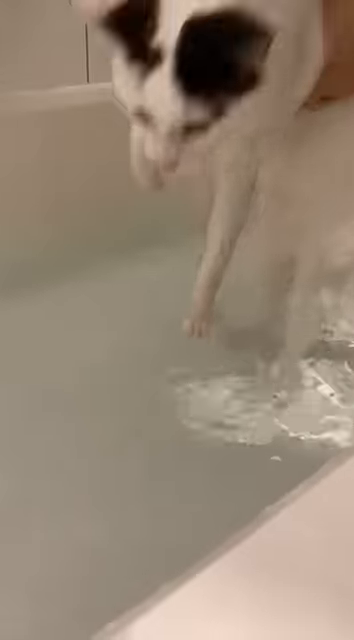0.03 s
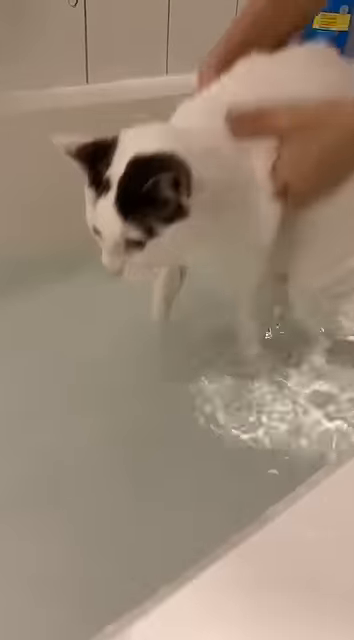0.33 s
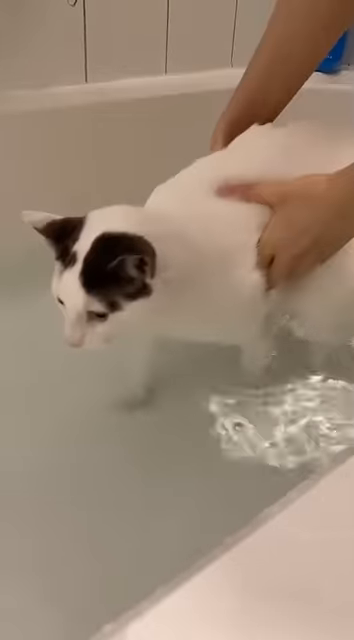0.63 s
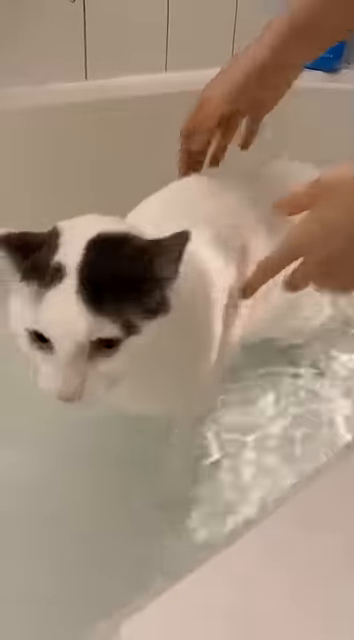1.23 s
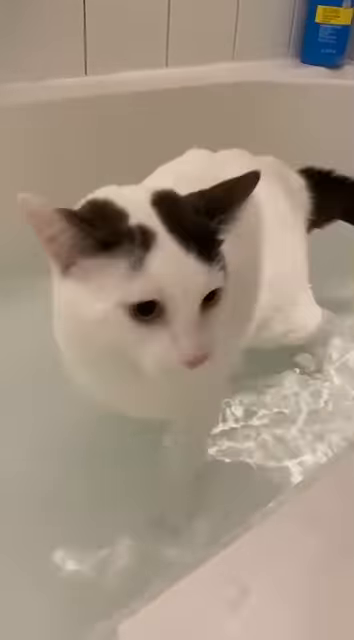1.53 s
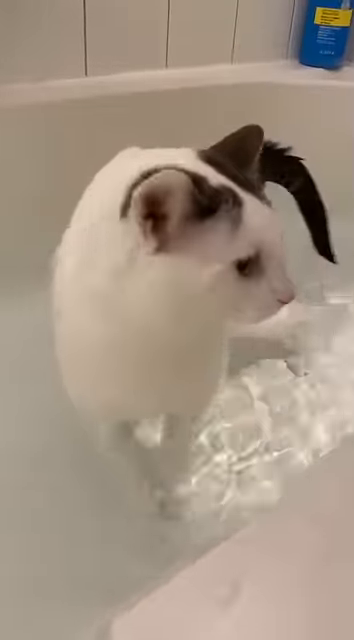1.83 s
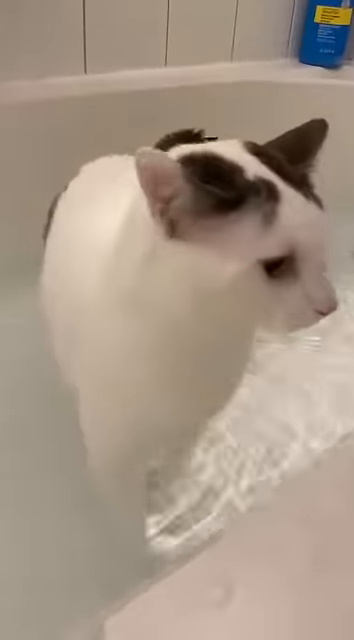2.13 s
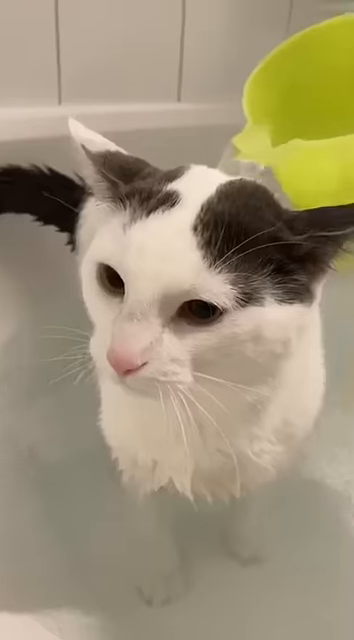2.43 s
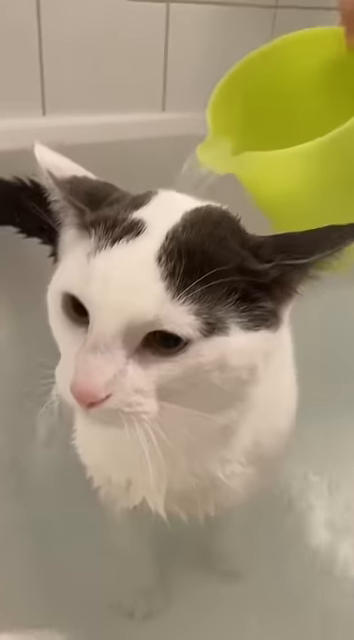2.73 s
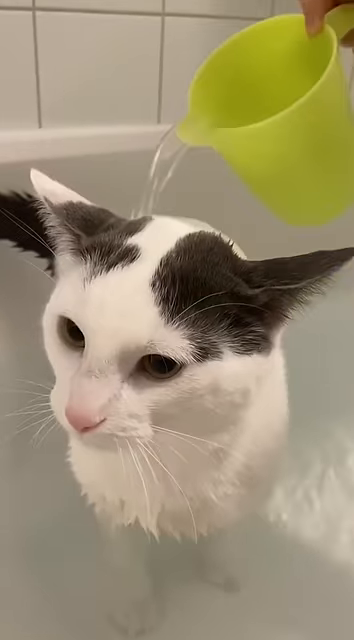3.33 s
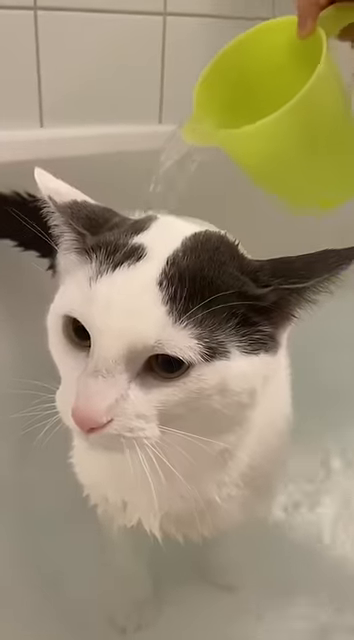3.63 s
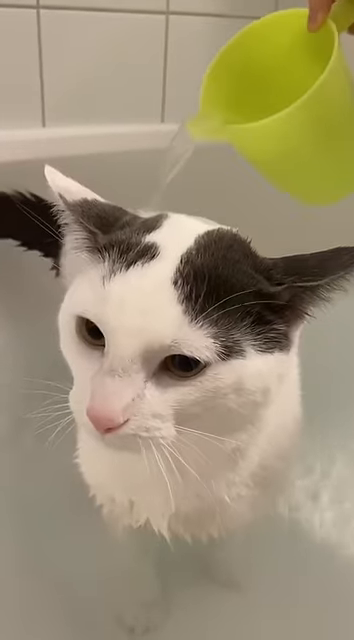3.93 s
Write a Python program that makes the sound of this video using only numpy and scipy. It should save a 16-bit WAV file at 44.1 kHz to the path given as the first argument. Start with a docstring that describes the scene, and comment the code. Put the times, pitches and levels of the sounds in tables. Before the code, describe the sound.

Water in a bathtub, heard from the rim: a small splash with drips, a quiet stretch of faint lapping, then louder sloshing and pouring with plops and sharp drops. A low rumble runs underneath in the small, echoing bathroom.

```python
"""Bathing a cat

A cat wades in a part-filled tub in a small tiled bathroom: a paw splashes and drips fall over a low
rumble. The level dips briefly, the water sloshes and rings the tub, and a jug is emptied over the cat.
Heard from the rim, the run-off gurgles, spatters and plops: trapped air bubbles ring like tiny bells,
and drops crack as they hit the water."""
import sys
import numpy as np
from scipy import signal
from scipy.fft import rfft, irfft
from scipy.io import wavfile
from scipy.ndimage import uniform_filter1d

SR = 44100
rng = np.random.default_rng(int(sys.argv[2]) if len(sys.argv) > 2 else 0)


def to_wav(sig):
    """Store sig (one row per channel, or 1-D mono) as 16-bit WAV at the path in sys.argv[1].

    Samples outside -1..1 are clipped; the rate is SR.
    """
    pcm = np.clip(np.atleast_2d(sig), -1, 1) * 32767
    pcm = np.round(pcm).astype(np.int16)
    wavfile.write(sys.argv[1], SR, pcm.T)  # frames by channels


N = 176400
TIME = np.arange(N) / SR
SIDES = np.array([[1], [-1]])  # plus on the left, minus on the right
TOP_HZ = 16200


def undb(db):
    """Turn decibels into a gain."""
    return 10 ** (np.asarray(db) / 20)


def unit(x):
    """Scale a sound to an average (rms) level of 1."""
    return x / np.sqrt(np.mean(x ** 2) + 1e-20)


def curve(table, column=1):
    """Join a table's levels into a gain that changes over time."""
    table = np.array(table)
    return undb(np.interp(TIME, table[:, 0], table[:, column]))


def over_hz(points):
    """Join (frequency, value) points into a curve over all frequencies."""
    hz, value = np.array(points).T
    every_hz = np.arange(N + 1) * SR / (2 * N)
    return np.interp(np.log(every_hz + 1), np.log(hz), value)


def shape(x, response):
    """Give each frequency its own gain and phase."""
    return irfft(rfft(x, 2 * N) * response)[..., :N]


def colour(x, points):
    """Change the tone to follow (f/Hz, level/dB) points."""
    cepstrum = irfft(np.log(undb(over_hz(points))))
    cepstrum[1:N] *= 2
    cepstrum[N + 1:] = 0  # so the filter never rings ahead of the sound
    return shape(x, np.exp(rfft(cepstrum)))


def band(x, lo_hz, hi_hz, order=2):
    """Keep what lies between two frequencies."""
    edges = [lo_hz, min(hi_hz, SR / 2 - 100)]
    return signal.sosfilt(signal.butter(order, edges, "band", fs=SR, output="sos"), x)


def noise_band(lo_hz, hi_hz):
    """Noise between two frequencies, at level 1."""
    return unit(band(rng.standard_normal(N), lo_hz, hi_hz))


def add(out, start_s, sound):
    """Mix a sound in at a given time."""
    i = max(int(start_s * SR), 0)
    out[..., i:i + sound.shape[-1]] += sound[..., :max(N - i, 0)]


# The tone of the room's rumble: f/Hz, level/dB
RUMBLE_TONE = [(25, -31.5), (58, -1.5), (92, -3.5), (123, -0.5), (190, -7), (263, -6.5), (480, -19),
               (2500, -33.5), (3000, -42), (5600, -55), (7300, -83), (10400, -43.5), (16000, -73)]
def rumble():
    """A low rumble like ventilation, with a weak, unsteady hum; the bass is alike in both ears."""
    middle, side = rng.standard_normal((2, N))
    width = .87 * band(side, 1050, 7300, order=1) * SIDES
    air = unit(colour(middle + width, RUMBLE_TONE))
    hum = sum(noise_band(hz - 4, hz + 4) for hz in (65.6, 128.2))
    return undb(-48.5) * air + undb(-56) * hum


def bathroom(x, width=.6):
    """Add the many quick echoes from tub and tiles; the treble dies away first."""
    age = np.arange(SR * 3 // 4) / SR
    middle, side = rng.standard_normal((2, len(age)))
    side = width * band(side, 377, TOP_HZ) * SIDES
    bounces = (middle + side) / np.hypot(1, width) * (age > .002)
    echo = 0
    for lo_hz, hi_hz, fade_s, db in [(59, 1800, .34, -3), (3150, SR / 2, .084, -4.5)]:
        fade = undb(-60 * age / fade_s)
        echo += undb(db) * band(bounces, lo_hz, hi_hz) * fade / np.sqrt(np.sum(fade ** 2))
    return x + signal.fftconvolve(x, echo, axes=1)[:, :N]


def bubble(hz, cycles, glide=.11, onset_cycles=.97):
    """Trapped air rings, fading 40 dB over its cycles and rising in pitch as it nears the surface."""
    age_cycles = np.arange(int(cycles / hz * SR) + 2) * hz / SR
    life = age_cycles / cycles
    tone = np.sin(2 * np.pi * age_cycles * (1 + glide * life / 2))
    onset = 1 - np.exp(-age_cycles / onset_cycles)
    return tone * onset * undb(-40 * life)


def swarm(range_hz, per_s, cycles, spread_db, pan_db=3):
    """Many bubbles of random time, pitch, loudness and place, held near level 1."""
    out = np.zeros((2, N))
    lo_hz, hi_hz = range_hz
    dice = np.random.default_rng(rng.integers(2 ** 31))
    for when, pitch, size, length, place in dice.random((int(per_s * N / SR), 5)):
        hz = min(lo_hz * (hi_hz / lo_hz) ** pitch, SR / np.e)
        db = spread_db * min(-np.log(1 - size), 4)
        pan = pan_db * (2 * place - 1) * SIDES
        add(out, when * N / SR, undb(db + pan) * bubble(hz, cycles * (.5 + length)))
    power = uniform_filter1d(np.mean(out ** 2, axis=0), SR // 5)
    return out / np.sqrt(power + 1e-9)


# Paws breaking the surface: t/s, level/dB, fade/s, lowest f/Hz, highest f/Hz
PAW_SPLASHES = [(0.164, -33.5, 0.017, 2500, 3370), (.603, -59.5, 0.019, 690, 5540),
                (1.302, -57, 0.021, 1190, 6050)]
def paws():
    """Each paw stirs up a short burst of small bubbles."""
    out = 0
    for start_s, db, fade_s, lo_hz, hi_hz in PAW_SPLASHES:
        progress = np.maximum(TIME - start_s, 0) / fade_s
        burst = 2 * progress * np.exp(-progress)
        out += undb(db) * burst * swarm((lo_hz, hi_hz), per_s=750, cycles=18, spread_db=-3.5)
    return out


# How much the cat's legs stir the water: t/s, level/dB
STIRRING = [(0, -62), (.15, -59.5), (.21, -49), (.33, -64), (.58, -74.5), (.75, -74), (.99, -71),
            (1.28, -79), (1.34, -63), (1.6, -83.5)]
def wading(swish_at_s=.915, swish_width_s=.13):
    """Water laps, trickles and swishes faintly round the legs."""
    swell = np.exp(-((TIME - swish_at_s) / swish_width_s) ** 2)
    swish = undb(-66) * swell * noise_band(2150, 2640)
    lapping = swarm((580, 2900), per_s=500, cycles=18, spread_db=2)
    trickle = swarm((3400, 13000), per_s=2200, cycles=6.6, spread_db=-3.5)
    return swish + curve(STIRRING) * (lapping + undb(-5.5) * trickle)


# The natural notes of tub and room: f/Hz, level/dB, time to fade by 60 dB/s
TUB_NOTES = [(108, -4, .8), (307, -10, .4), (340, -1, .3), (383, 2, .3), (483, -6, .45), (553, -8, .55),
             (872, 0, .28), (902, -1, .35), (1068, -7, .3)]
def tub_ring(age, rise_s=.011):
    """The struck tub rings; notes above 377 Hz reach the two ears a little out of step."""
    out = 0
    for hz, db, fade_s in TUB_NOTES:
        level = undb(db - 60 * age / fade_s) * np.minimum(age / rise_s, 1)
        apart_rad = .6 * (hz > 377) * rng.random() * SIDES
        out += level * np.sin(2 * np.pi * (hz * age + rng.random()) + apart_rad)
    return out


# Masses of water plunging in: t/s, level/dB, rise/s, fade/s, ring offset/dB, thud offset/dB
PLUNGES = [(2.185, -35, 0.062, 0.14, 3.5, -16), (2.814, -31.5, 0.016, 0.033, -11.5, -1.5),
           (3.71, -47, 0.0042, 0.0072, -15, 4.5)]
# The tone of the churning water: f/Hz, level/dB
CHURN_TONE = [(60, 14.5), (100, 8.5), (200, -13.5), (320, 1.5), (550, 1.5), (1000, -13), (2200, 2.5),
              (4500, -4.5), (16000, -38)]
def sloshes(thud_fade_s=.08):
    """Each plunge churns up bubbles, thuds on the tub and rings it; returns water and tub apart."""
    churn, thud, ring = 0, 0, 0
    for start_s, db, rise_s, fade_s, ring_db, thud_db in PLUNGES:
        age = np.maximum(TIME - start_s, 0)
        rise = np.minimum(age / rise_s, 1)
        churn += undb(db) * rise * np.exp(-np.maximum(age - rise_s, 0) / fade_s)
        thud += undb(db + thud_db) * rise * np.exp(-age / thud_fade_s)
        ring += undb(db + ring_db) * tub_ring(age)
    cloud = swarm((90, 7000), per_s=1500, cycles=8.3, spread_db=1.5)
    bright_cloud = colour(cloud, [(90, -9), (7000, 16.5)])
    water = churn * unit(colour(bright_cloud, CHURN_TONE))
    tub = undb(3) * ring + thud * noise_band(93, 149)
    return water, tub


# Drops hitting the water, from full slaps to fine ticks: t/s, level/dB, lowest f/Hz
DROP_HITS = [(0.048, -35, 3580), (0.188, -30, 1500), (0.223, -25.5, 1000), (0.6, -47, 5000),
             (1.307, -43, 1200), (2.189, -15.5, 850), (2.248, -24, 3000), (2.292, -21.5, 2500),
             (2.299, -18, 6000), (2.666, -29, 1210), (2.699, -19, 3000), (2.818, -14, 1500),
             (2.823, -13, 5000), (2.829, -31, 1500), (2.97, -14.5, 5830), (3.001, -17, 1490),
             (3.049, -19, 3570), (3.13, -21, 4460), (3.204, -24.5, 2980), (3.281, -23.5, 5500),
             (3.392, -25, 4050), (3.43, -23.5, 1500), (3.763, -24, 4000), (3.825, -30, 4530),
             (3.922, -22, 1100)]
def smacks(fade_s=.002, top_hz=11200):
    """Each drop strikes the surface with a short crack of noise."""
    out, age = np.zeros(N), np.arange(SR // 50) / SR
    for start_s, db, lo_hz in DROP_HITS:
        crack = rng.standard_normal(len(age)) * np.exp(-age / fade_s)
        add(out, start_s, undb(db) * .5 * band(crack, lo_hz, top_hz, order=1))
    return out


# Single bubbles, from deep gulps to tiny plinks: t/s, f/Hz, level/dB, ring length/cycles
SINGLE_BUBBLES = [(0.091, 3020, -43, 44), (.107, 5440, -39, 10), (0.171, 2800, -18, 12),
                  (0.186, 2860, -34, 56), (0.275, 1876, -35, 35), (0.414, 5500, -54, 59),
                  (1.307, 1573, -47, 61), (1.401, 1376, -44.5, 38), (2.206, 1690, -25, 44),
                  (2.259, 2170, -24.5, 12), (2.321, 1017, -32, 37), (2.427, 1063, -32, 15),
                  (2.595, 1010, -35.5, 30), (2.649, 886, -31.5, 19), (2.669, 2880, -20, 13),
                  (2.701, 2034, -19.5, 25), (2.728, 2540, -23, 46), (2.737, 2620, -13.5, 26),
                  (2.825, 262, -32, 6.9), (2.828, 576, -32, 57), (2.852, 2470, -21, 9),
                  (2.952, 2780, -22.5, 30), (3.130, 5860, -28, 18), (3.504, 1015, -33.5, 18),
                  (3.578, 5280, -34, 37), (3.637, 4810, -25.5, 36), (3.662, 4700, -25.5, 29),
                  (3.662, 1436, -24, 13), (3.762, 5260, -34, 28), (3.795, 2420, -34, 200),
                  (3.922, 1410, -22, 2.2)]
def plops():
    """Bubbles that ring out one by one."""
    out = np.zeros(N)
    for start_s, hz, db, cycles in SINGLE_BUBBLES:
        ring = bubble(hz, cycles)
        add(out, start_s, undb(db) * ring / np.abs(ring).max())
    return out


# How hard the stream drums on the tub: t/s, level/dB
DRUM_LEVELS = [(2.25, -38), (2.6, -50.5), (2.84, -34), (3.05, -45.5), (3.3, -69)]
def drumming():
    """The falling stream keeps the tub's lowest note booming."""
    return noise_band(98.3, 111.6) * curve(DRUM_LEVELS)


# How loudly the tiny bubbles ping: t/s, level/dB
PING_LEVELS = [(3.35, -55.5), (3.63, -43), (3.85, -63), (3.94, -43.5)]
def pings():
    """As the stream thins, it traps tiny, high-pitched bubbles."""
    return swarm((4530, 5670), per_s=200, cycles=21, spread_db=5.5) * curve(PING_LEVELS)


def spatter(clump_s=.012, clump_db=4):
    """The stream breaks into clumps of fine drops, so their level jumps at random."""
    tiniest = swarm((8540, 12360), per_s=110, cycles=7, spread_db=4)
    spray = swarm((2315, 17200), per_s=3600, cycles=4.9, spread_db=2.5)
    hold = int(clump_s * SR)
    jumps = np.repeat(rng.standard_normal(N // hold + 1), hold)
    clumps = unit(undb(clump_db * uniform_filter1d(jumps, hold // 2)[:N]))
    return (spray + undb(-7) * tiniest) * clumps


# Water running off the cat: t/s, gurgle level/dB, fizz level/dB, spatter level/dB
RUN_OFF = [(2.17, -58, -55, -59), (2.2, -33.5, -27.5, -43), (2.33, -41.5, -58, -42.5),
           (2.54, -50, -52, -52), (2.64, -40.5, -42.5, -47), (2.75, -41, -37, -41),
           (2.84, -36.5, -33.5, -40.5), (2.91, -42.5, -53, -43), (2.98, -38.5, -41.5, -43.5),
           (3.1, -46, -55, -52), (3.28, -41.5, -54.5, -51.5), (3.37, -54, -52.5, -56.5),
           (3.44, -43, -51, -53.5), (3.57, -57.5, -52.5, -46.5), (3.68, -41.5, -42.5, -45.5),
           (3.87, -59, -49.5, -55.5), (3.93, -39.5, -51, -47.5), (4.0, -59, -45, -47.5)]
def pour():
    """The run-off hits the bath: big bubbles gurgle, small ones fizz, drops spatter, the tub drums."""
    gurgle = swarm((310.5, 1378), per_s=340, cycles=17.4, spread_db=2) * curve(RUN_OFF, 1)
    fizz = swarm((1263, 3744), per_s=600, cycles=11.7, spread_db=6) * curve(RUN_OFF, 2)
    stream = gurgle + fizz + pings() + spatter() * curve(RUN_OFF, 3) + drumming()
    pouring = TIME > RUN_OFF[0][0]
    return undb(-3.5) * pouring * stream


# The microphone's tone: f/Hz, level/dB
MIC_TONE = [(5000, 3.5), (6300, 10), (7600, -1), (8600, 6.5), (12200, 7.5), (15000, 6), (16000, -14)]
# How far its left side runs ahead of its right: f/Hz, phase/rad
LEFT_LEAD = [(100, 0), (2000, .2), (2700, 2), (3900, 1.4), (5000, .4), (6800, 3), (9900, 6), (16500, 13)]
# How much louder its left side is: f/Hz, level/dB
LEFT_BOOST = [(170, 0), (400, 3), (1300, 3.5), (2300, -.5), (5000, 0)]
def microphone(x):
    """A microphone with two close openings brightens the sound and hears each side differently."""
    bright = band(colour(x, MIC_TONE), 80, 20000, order=4)
    balance = undb(SIDES / 2 * over_hz(LEFT_BOOST))
    timing = np.exp(1j * SIDES / 2 * over_hz(LEFT_LEAD))
    return shape(bright, balance * timing)


def scene():
    """The water with its echoes and the ringing tub, heard close up over the rumble."""
    churn, tub = sloshes()
    water = paws() + wading() + pour() + churn + plops() + smacks()
    return undb(-4) * microphone(bathroom(water) + tub) + rumble()


def record(dry):
    """The level dips briefly just before the first slosh, and the highest treble is cut off."""
    from_s, to_s, dip_db = 2.148, 2.176, -9
    dip = uniform_filter1d(1. * ((TIME > from_s) & (TIME < to_s)), SR // 60)
    treble_cut = signal.ellip(8, .2, 70, TOP_HZ, fs=SR, output="sos")
    return signal.sosfilt(treble_cut, dry * undb(dip_db * dip))


dry = scene()
out = record(dry)
to_wav(out)
```